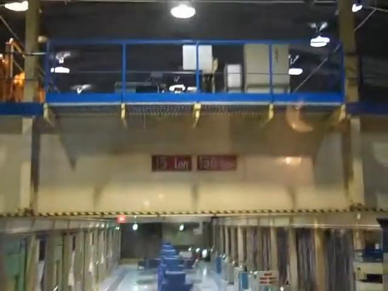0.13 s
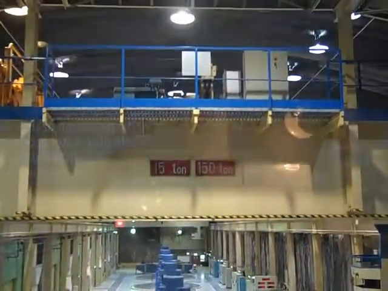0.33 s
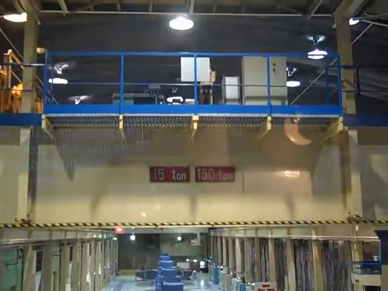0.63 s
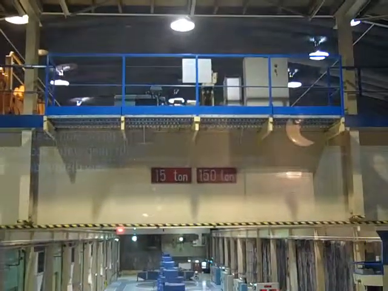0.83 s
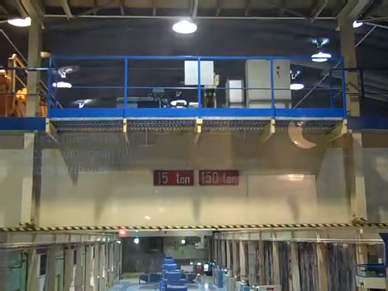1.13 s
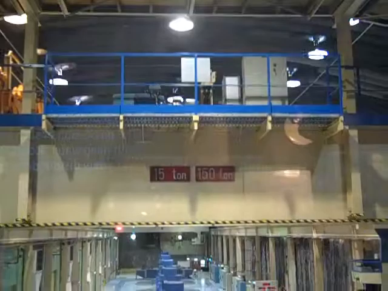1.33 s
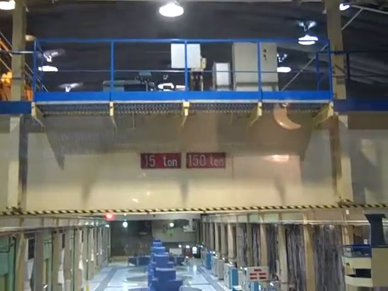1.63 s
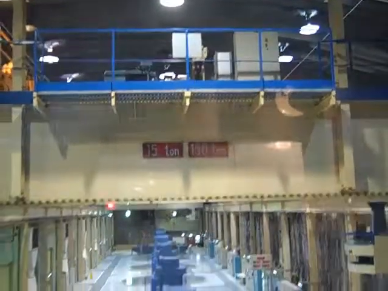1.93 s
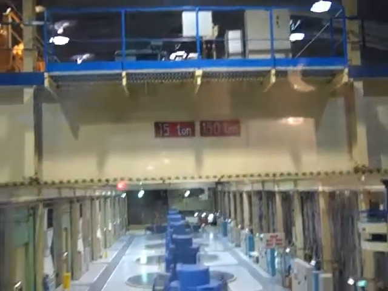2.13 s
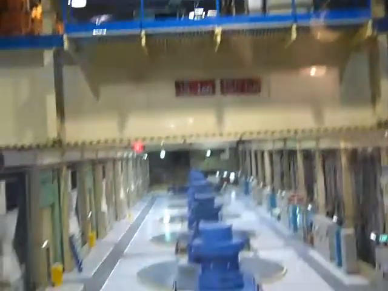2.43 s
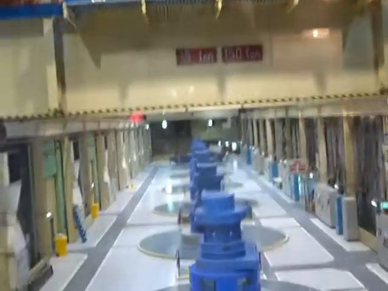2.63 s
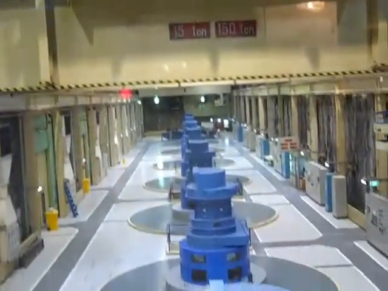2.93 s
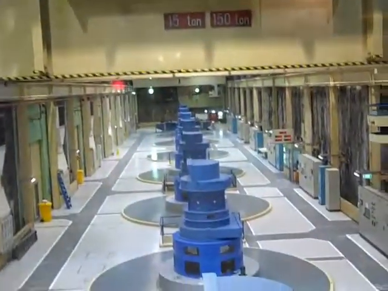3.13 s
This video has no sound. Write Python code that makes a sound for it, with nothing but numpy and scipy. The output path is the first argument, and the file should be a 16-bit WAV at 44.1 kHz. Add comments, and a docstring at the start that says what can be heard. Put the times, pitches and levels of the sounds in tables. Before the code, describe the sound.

Generators roar and hum steadily in a long reverberant hall, heard on a turning stereo microphone; the level repeatedly drops suddenly and creeps back, thin hisses swell on the left, and metal clinks faintly near the end.

```python
"""Generators drone in a long hard hall, heard on a stereo microphone that turns as it listens.
From the start: shaped noise makes a broad roar, sine waves make the mains hum and a fan's blade tones.
Soon narrow noise near 8 kHz swells as a thin hiss, now and then, leaning left; again and again the whole
level drops abruptly, after a brief swell of the bass, and creeps back.
Near 3 s something small clinks once: a noise tick and a few ringing metal modes."""
import sys
import numpy as np
from scipy import signal
from scipy.fft import rfft, irfft, next_fast_len
from scipy.io import wavfile
from scipy.ndimage import uniform_filter1d, map_coordinates

SR = 44100
rng = np.random.default_rng(int(sys.argv[2]) if len(sys.argv) > 2 else 0)


def unload_audio(sound):
    """Save the sound as a 16-bit wav file, at the path given as the first command line argument."""
    columns = np.transpose(np.atleast_2d(sound))
    # keep every value between -1 and 1, then stretch to whole-number steps
    steps = np.round(np.clip(columns, -1, 1) * 32767)
    wavfile.write(sys.argv[1], SR, steps.astype(np.int16))


N = 144207
T = np.arange(N) / SR  # seconds

# Course of the roar's level, ahead of the hall and the drops: time_s, level_db
ROAR_LEVEL = [(0, -15), (.4, -14), (1.2, -14.5), (1.7, -16), (2.03, -13.5), (2.35, -16.5), (2.49, -13.5),
              (2.7, -16), (3.27, -16)]
# Colour of the roar, relative: pitch_hz, level_db
ROAR_SPECTRUM = [(15, -51.5), (25, -10.5), (42, -10), (55, -25), (72, -7), (92, -3), (110, -10), (125, -3),
                 (144, 0.5), (175, -2), (238, 1.5), (290, -3.5), (340, -3.5), (370, -8), (470, -11),
                 (600, -13.5), (725, -19), (896, -21), (1410, -28.5), (1780, -30.5), (3000, -36),
                 (4890, -44), (6500, -44.5), (7700, -40.5), (8700, -48), (9600, -54), (10500, -60),
                 (12500, -66), (14200, -68.5)]
# How alike the hall sounds at the two microphone ports: pitch_hz, likeness (1 = identical)
PORT_LIKENESS = [(30, 0.67), (90, 0.92), (130, 0.96), (280, .99), (610, .98), (1330, 0.67), (2900, 0.16),
                 (6290, 0.027), (13700, 0.12)]
# Balance of the hall between the ports: pitch_hz, left_over_right_db
PORT_BALANCE = [(30, -3), (90, -2.5), (150, -0.8), (610, 0.1), (1330, .5), (2900, 4.5), (6290, 7),
                (13700, 4.5)]
# Hum orders, drifting as the microphone turns:
# mains_multiple (rounded to whole when played), early_db, midway_db, late_db
HUM_ORDERS = [(2.017, -20.5, -18, -22.5), (4.048, -24.5, -26, -18), (4.952, -22.5, -22.5, -24),
              (6.04, -29, -31.5, -27.5), (6.93, -33, -28.5, -22.5), (7.93, -39.5, -29, -35.5),
              (8.94, -38, -36.5, -34), (10.005, -32.5, -33, -43), (11.04, -37.5, -37.5, -34),
              (11.97, -35.5, -36, -26.5), (14.07, -42.5, -53, -43), (15, -41.5, -44.5, -47),
              (16, -55, -50.5, -47), (17.9, -39.5, -48, -44.5), (27.06, -59.5, -56.5, -57.5)]
# Fan tones, drifting likewise: blade_rate_multiple, early_db, midway_db, late_db
FAN_ORDERS = [(1, -43, -26.5, -26.5), (2, -33.5, -33.5, -37.5), (3, -30, -38, -39),
              (4, -43.5, -41.5, -36.5), (5, -48.5, -40, -49.5), (6, -44.5, -50.5, -56.5),
              (7, -47, -50.5, -57.5), (8, -55, -49.5, -57), (9, -57.5, -55, -53.5)]
# Drops of the whole level: start_s, depth_db
LEVEL_DROPS = [(0.091, 0.5), (0.463, 6), (0.69, 3), (0.943, 3), (1.11, 0), (1.275, 2.5), (1.414, 3.5),
               (1.581, 7.5), (1.854, 5.5), (2.209, 1), (2.514, 4), (2.753, 7), (3.062, 4)]
# Swells of hiss: start_s, attack_s, decay_s (time constant), level_db
HISS_SWELLS = [(.04, 0.015, 0.061, -51.5), (.28, 0.024, 0.27, -44.5), (0.801, .04, 0.11, -53),
               (2.1, 0.032, 0.091, -49.5), (2.46, .02, 0.038, -45), (2.704, 0.0027, 0.023, -42)]
# Ringing modes of the clinking metal, relative to the clink: pitch_hz, level_db, t60_s
METAL_MODES = [(9000, 5, .1), (10700, -5, .12), (12100, -7, .2), (13800, -6, .2)]

MAINS_HZ, BLADE_HZ = 50, 219.3
WAVER_PER_S, WAVER_RAD, WAVER_DB = 14, 0.63, 2
STEADY_BELOW_HZ = 120  # tones waver less toward and below this pitch
HISS_HZ, HISS_WIDTH_HZ = 7920, 1900
HIGH_LEAN_DB = 9.5  # hiss and clink, left over right
CLINK_S, CLINK_DB, CLINK_RISE_S = 2.961, -48, 0.002
TICK_DB, TICK_T60_S, TICK_ABOVE_HZ = 0, 0.2, 7000  # level relative to the clink
BLUR_PER_S = 500
SURGE_DB_PER_DB, SURGE_S, SURGE_BELOW_HZ = 0.6, 0.01, 500
FALL_S, HOLD_S, RECOVER_DB_PER_S = 0.008, 0.031, 40.5
CEILING, TOP_HZ = 0.95, 14260
SIDES = np.array([[0.5], [-0.5]])  # share of a left-right difference: left, right


def amp(db):
    """Decibels to amplitude."""
    return 10 ** (np.asarray(db) / 20)


def unit(x):
    """Scale to an rms of one."""
    return x / np.sqrt(np.mean(x ** 2) + 1e-20)


def along(points, hz):
    """Read a (pitch_hz, value) table along a log pitch axis."""
    f, v = np.transpose(points)
    return np.interp(np.log(hz + 1), np.log(f + 1), v)


def wobble(rate):
    """A smooth random curve through `rate` random knots a second."""
    return map_coordinates(rng.standard_normal(2000), [T * rate])


def filtered(x, response):
    """Multiply the spectrum of x by a response of frequency, padded against wrap-around."""
    m = next_fast_len(N + SR // 2)
    hz = np.fft.rfftfreq(m, 1 / SR)
    return irfft(rfft(x, m) * response(hz), m)[..., :N]


def roar():
    """Air and bearing noise of all the machines, smeared by the hall, in faint patches of time and pitch."""
    spectra = signal.stft(rng.standard_normal((2, N + 1024)), nperseg=512)[2]
    patches = rng.standard_normal(spectra.shape[1:])
    patches = uniform_filter1d(patches, size=8, axis=0)  # across pitch
    patches = uniform_filter1d(patches, size=12, axis=1)  # across time
    patchy_db = 1.1 * unit(patches)
    pair = signal.istft(spectra * amp(patchy_db), nperseg=512)[1][:, :N]
    noise = unit(filtered(pair, lambda hz: amp(along(ROAR_SPECTRUM, hz))))
    return noise * amp(np.interp(T, *np.transpose(ROAR_LEVEL)))


def hiss():
    """Noise in one narrow high band, each swell rising straight and dying away exponentially."""
    def band(hz):
        return 1 / (1 + ((hz - HISS_HZ) / HISS_WIDTH_HZ * 2) ** 2)

    swells = np.zeros(N)
    for start_s, attack_s, decay_s, level_db in HISS_SWELLS:
        rise = np.clip((T - start_s) / attack_s, 0, 1)
        fade = np.exp(-np.clip(T - start_s - attack_s, 0, None) / decay_s)
        swells += amp(level_db) * rise * fade
    noise = unit(filtered(rng.standard_normal((2, N)), band))
    return swells * noise * amp(SIDES * HIGH_LEAN_DB)


def clink():
    """A small piece of metal ticks and rings briefly, each mode blurred by a fast random curve."""
    t = np.clip(T - CLINK_S, 0, None)

    def mode(pitch_hz, level_db, t60_s):
        decay = amp(level_db - 60 * t / t60_s)
        return decay * wobble(BLUR_PER_S) * np.sin(2 * np.pi * pitch_hz * t)

    def treble(hz):
        return 1 / (1 + (TICK_ABOVE_HZ / (hz + 1)) ** 6)

    ring = np.array([sum(mode(*row) for row in METAL_MODES) for _ in range(2)])
    tick = amp(TICK_DB - 60 * t / TICK_T60_S) * filtered(rng.standard_normal((2, N)), treble)
    rise = 1 - np.exp(-t / CLINK_RISE_S)  # silent until the clink
    return rise * amp(CLINK_DB + SIDES * HIGH_LEAN_DB) * (ring + tick)


def tones(base_hz, orders):
    """Multiples of one rate, wavering in level and phase as the echoes mix; the lowest hold steadier."""
    def tone(multiple, *level_db):
        pitch_hz = round(multiple) * base_hz
        unsteady = np.tanh(pitch_hz / STEADY_BELOW_HZ / 2)
        turning_db = np.interp(T, [0, T[-1] / 2, T[-1]], level_db)
        level = amp(turning_db + unsteady * WAVER_DB * wobble(WAVER_PER_S))
        phase = 2 * np.pi * (pitch_hz * T + rng.random())
        return level * np.sin(phase + unsteady * WAVER_RAD * wobble(WAVER_PER_S))

    # Separate wavering for each of the pair; sqrt(2) makes the listed levels rms
    return np.sqrt(2) * np.array([sum(tone(*row) for row in orders) for _ in range(2)])


def fan():
    """Blades passing at a steady rate sound that rate and its multiples."""
    return tones(BLADE_HZ, FAN_ORDERS)


def mains_hum():
    """The generators hum at whole multiples of the mains frequency."""
    return tones(MAINS_HZ, HUM_ORDERS)


def surged(x):
    """The bass swells for a moment ahead of each drop, more for a deeper one."""
    swell_db = sum(SURGE_DB_PER_DB * depth_db * np.exp(-((T - start_s + SURGE_S) / SURGE_S) ** 2)
                   for start_s, depth_db in LEVEL_DROPS)
    bass = filtered(x, lambda hz: 1 / (1 + (hz / SURGE_BELOW_HZ) ** 4))
    return x + (amp(swell_db) - 1) * bass


def placed(pair):
    """Mix two unrelated sounds as the two ports hear a hall: alike in the bass, unrelated and left-heavy above."""
    def shares(hz):
        angle = np.arccos(np.clip(along(PORT_LIKENESS, hz), -1, 1)) / 2
        return np.array([np.cos(angle), np.sin(angle)])

    mid, side = filtered(pair, shares)
    ports = np.array([mid + side, mid - side])
    return filtered(ports, lambda hz: amp(SIDES * along(PORT_BALANCE, hz)))


def drops_db():
    """The level falls abruptly, waits and climbs back at a steady rate; overlapping drops add."""
    total_db = np.zeros(N)
    for start_s, depth_db in LEVEL_DROPS:
        fall = np.clip((T - start_s) / FALL_S + 0.5, 0, 1)
        recovered_db = RECOVER_DB_PER_S * np.clip(T - start_s - HOLD_S, 0, None)
        total_db -= fall * np.clip(depth_db - recovered_db, 0, None)
    return total_db


def scene():
    """The hall's drone with the small high sounds on top, all under the same level drops."""
    drone = surged(roar() + fan() + mains_hum())
    return (placed(drone) + hiss() + clink()) * amp(drops_db())


def record(dry):
    """The recorder rounds off the highest peaks and keeps nothing above its band limit."""
    rounded = dry / (1 + np.abs(dry / CEILING) ** 10) ** (1 / 10)
    return filtered(rounded, lambda hz: hz < TOP_HZ)


dry = scene()
out = record(dry)
unload_audio(out)
```